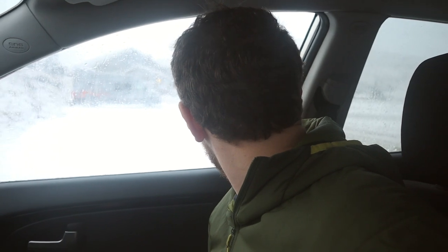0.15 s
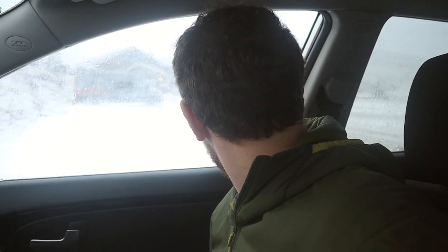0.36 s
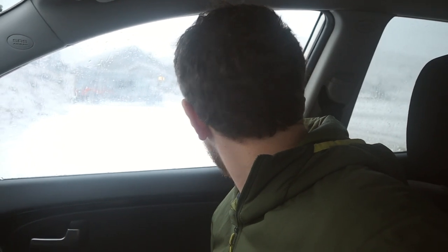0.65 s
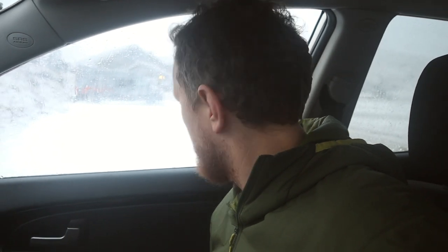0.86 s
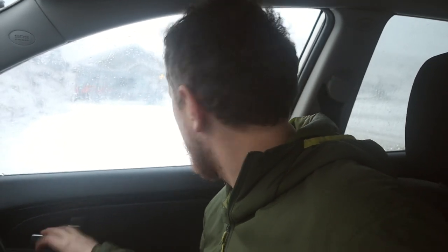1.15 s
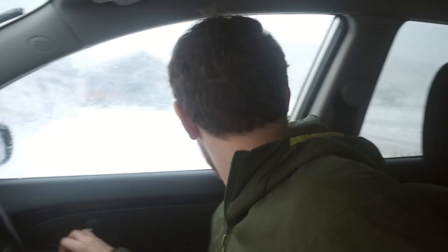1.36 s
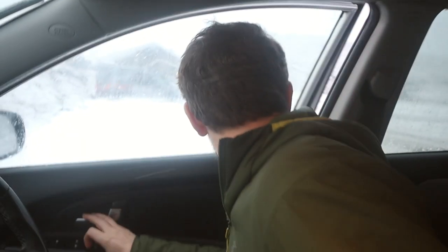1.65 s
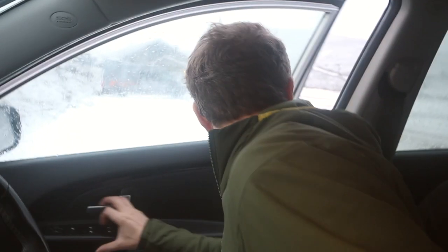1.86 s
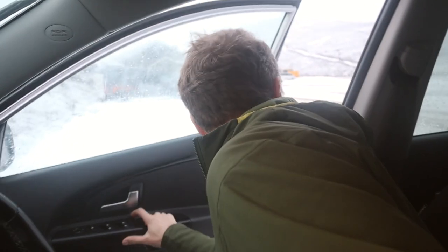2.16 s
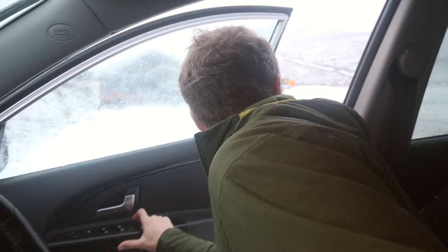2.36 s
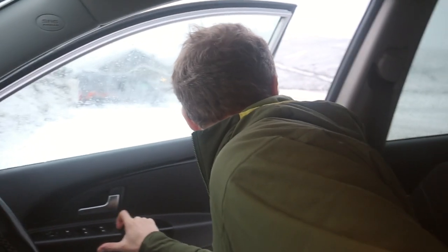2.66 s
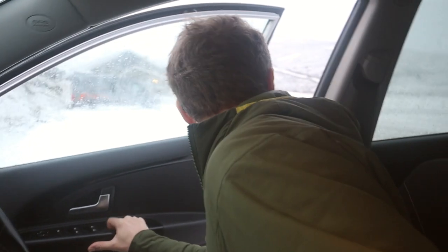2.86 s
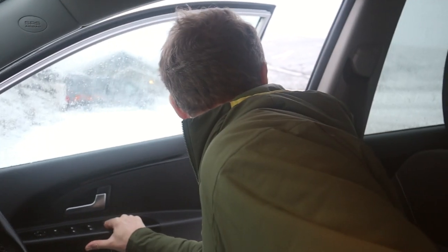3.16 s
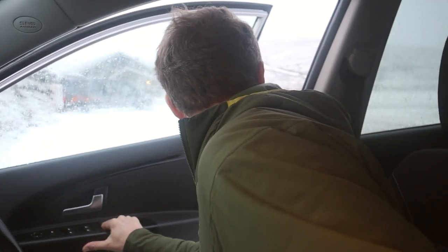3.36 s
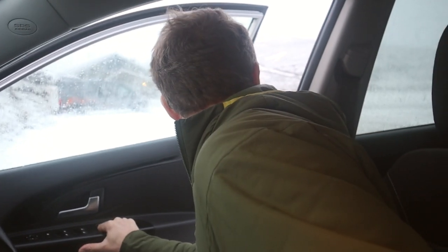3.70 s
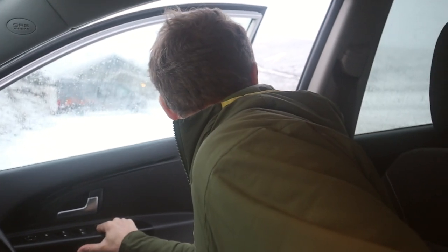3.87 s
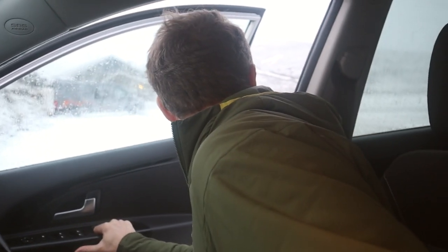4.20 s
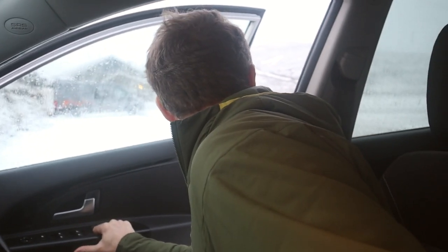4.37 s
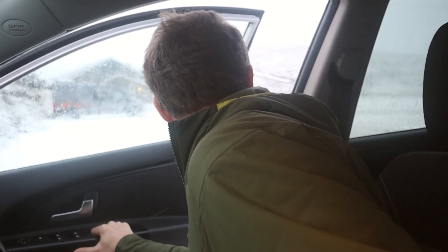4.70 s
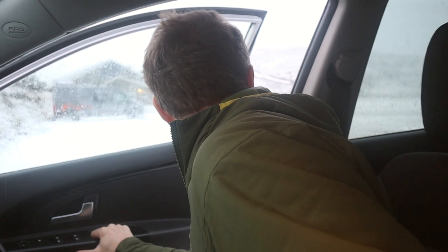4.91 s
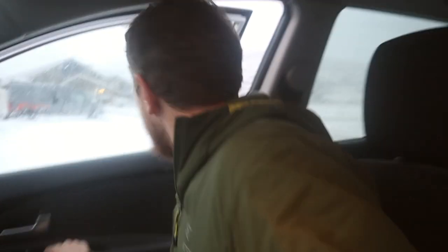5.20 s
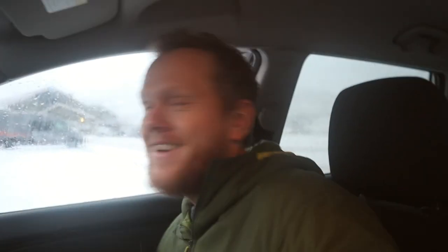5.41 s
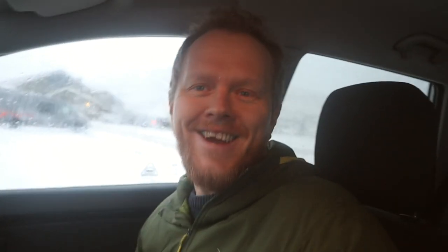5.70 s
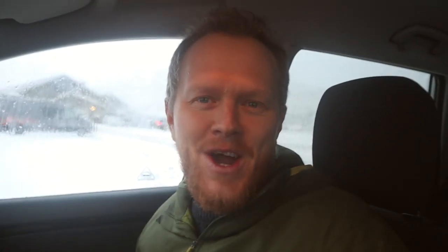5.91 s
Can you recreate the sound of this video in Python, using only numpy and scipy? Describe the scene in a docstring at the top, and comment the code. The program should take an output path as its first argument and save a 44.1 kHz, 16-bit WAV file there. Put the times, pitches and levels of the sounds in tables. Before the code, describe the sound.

Inside a parked car, a nylon jacket rustles, then a door handle knocks and the latch lets go with a clunk. Soft outdoor air comes in through the gap, and a small electric motor hums faintly under scattered plastic clicks. At the end the door is pulled shut with a loud, deep thump and a brief rattle. The microphone is close, inside the cabin.

```python
"""Hollow knocks and clicks sound inside a parked car as a hand bumps the door trim and the latch lets go.
With the door ajar, a small electric motor hums over the outdoor noise; switches click, a jacket rustles.
Then the door is pulled shut: its rubber seal chirps, the cabin booms and loose fittings rattle."""
import sys
import numpy as np
from scipy import signal
from scipy.io import wavfile

SR = 44100
rng = np.random.default_rng(int(sys.argv[2]) if len(sys.argv) > 2 else 0)


def put_to_file(sound):
    """Save the sound as 16-bit audio at rate SR, in the file named by the first command-line argument."""
    columns = np.atleast_2d(sound).T  # one column per channel
    safe = np.clip(columns, -1, 1)
    whole_steps = np.round(safe * 32767)
    wavfile.write(sys.argv[1], SR, whole_steps.astype(np.int16))


N = 266760
T = np.arange(N) / SR
BAND_EDGES_HZ = 22 * 2 ** np.arange(0, 10, .5)  # half an octave apart
UNLATCH_AT_S, SWING_FOR_S = 1.22, 1
SHUT_AT_S, PULL_FOR_S = 5.576, 0.19

# A "t60" is the time a sound takes to fade by 60 dB.
# knocks on the handle and the hollow behind it: (time [s], level [dB], pitch [Hz], t60 [s])
HAND_KNOCKS = [(1.153, -21, 368, 0.1), (1.252, -18, 245.6, 0.13), (1.373, -12.5, 396, 0.064),
               (1.386, -10.5, 419, 0.05), (1.659, -14, 321, 0.086), (1.669, -7, 254.4, 0.12),
               (1.846, -32, 231, 0.24), (2.018, -21.5, 200.4, 0.13), (2.077, -22, 219, 0.11),
               (2.570, -29.5, 326, 0.072), (2.726, -25.5, 390, 0.025)]


def door_blows(sealed_ring=1.17, loose_ring=0.57, contact_cycles=0.27):
    """Each blow makes the door boom and its panels clatter; soft ones start slowly and sound dull."""
    # blows on the door: (time [s], level [dB], boom against clatter [dB], dull above [Hz])
    blows = [(1.418, -7.5, -7.5, 596), (1.426, -11.5, 1.5, 970), (1.451, -13.5, 8, 454),
             (4.183, -34, -21, 1300), (4.991, -28.5, -15, 1010), (5.556, -11, -17, 1300),
             (5.576, -16, 9, 800), (5.608, -21, -4, 1450), (5.680, -20.5, -28, 900),
             (5.969, -33.5, -5, 920), (6.025, -23, -5.5, 930)]
    # deep tones of the door and cabin air: (pitch [Hz], level [dB], base t60 [s])
    boom_tones = [(49.3, -13, 0.41), (80.4, -10, 0.37), (91.8, -11, 0.55), (137.6, 0.5, 0.14),
                  (179, -5.5, 0.14), (203.5, -14.5, 0.17), (296.5, -24, 0.36), (367, -16, 0.086),
                  (455, -6.5, 0.13), (539, -1.5, 0.085), (624, -31, .06), (769, -5, 0.077),
                  (1000, -20, 0.034)]
    # the panels' crowded tones, played as bands of noise: (frequency [Hz], level [dB], t60 [s])
    panel_bands = [(150, -13, 0.33), (385, -4, 0.11), (880, -10, 0.06), (2000, -12, 0.15),
                   (5000, -8.5, 0.15), (14000, -18, .07)]
    out, t = np.zeros(N), T[:SR // 2]
    for s, db, boom_db, soft_hz in blows + door_bounces():
        stretch = sealed_ring if s > SHUT_AT_S - PULL_FOR_S else loose_ring  # a sealed cabin booms longer
        boom = clatter = 0
        for hz, tone_db, t60 in boom_tones:
            gain = from_db(tone_db) / np.hypot(1, (hz / soft_hz) ** 2)
            boom += gain * sine(hz, t) * fade(t, t60 * stretch)
        for low, high in zip(BAND_EDGES_HZ[5:], BAND_EDGES_HZ[6:]):
            band_db, t60 = at_hz(panel_bands, low)
            gain = from_db(band_db) / np.hypot(1, (low / soft_hz) ** 1.83)
            clatter += gain * unit_band(rng.standard_normal(len(t)), low, high) * fade(t, t60)
        push = 1 - np.exp(-(t * soft_hz / contact_cycles) ** 2)
        add(out, s, from_db(db) * push * (from_db(boom_db) * boom + clatter))
    return out


def door_bounces(count=3, every_s=.062, first_db=-24.5, loss_db=2, boom_db=9.5, soft_hz=240):
    """List the soft blows of the shut door bouncing on its seal, each a little weaker."""
    return [(SHUT_AT_S + (k + 1) * every_s, first_db - k * loss_db, boom_db, soft_hz)
            for k in range(count)]


def knocks(sag=0.11, sag_s=0.0196, rise_s=0.00098, steel_from_db=-7.5, steel_growth=1.8):
    """The hollow behind the handle rings; the harder the knock, the more the latch steel joins in."""
    # tones of the hollow: (multiple of the knock's pitch, level [dB])
    hollow_tones = [(.81, -4.5), (1.001, 4), (1.13, -2), (1.45, -5.5), (1.85, -8.5)]
    # tones of the latch steel: (pitch [Hz], level [dB], t60 [s])
    steel_tones = [(780, -4, 0.021), (1695, -11.5, 0.035), (1752, -4, 0.032), (2010, -16, 0.052),
                   (3740, -8.5, 0.016)]
    out, t = np.zeros(N), T[:SR // 3]
    bent_time = t + sag * sag_s * (1 - np.exp(-t / sag_s))  # the pitch sinks as the hand covers the hollow
    steel = sum(from_db(db) * sine(hz, t) * fade(t, t60) for hz, db, t60 in steel_tones)
    for s, db, hz, t60 in HAND_KNOCKS:
        tones = sum(from_db(tone_db) * sine(hz * k, bent_time) for k, tone_db in hollow_tones)
        hollow = tones * (1 - np.exp(-t / rise_s)) * fade(t, t60)
        steel_gain = from_db(steel_growth * (db - steel_from_db))
        add(out, s, from_db(db) * (hollow + steel_gain * steel))
    return out


def knock_clicks(ring_hz=1807, edge_db=-12.5, body_db=-7.5, dulling=0.81, dull_from_db=-17):
    """List the click that starts each knock; a heavy knock loses some of its bright edge."""
    return [(s, db - 3.5, ring_hz, edge_db - dulling * max(db - dull_from_db, 0), body_db)
            for s, db, *_ in HAND_KNOCKS]


def clicks(rise_s=0.0012, trim_hz=3240, blend=0.2):
    """Hard plastic parts meet: a crack of noise, plus a short ring from the part and from the trim."""
    # latch, switch and trim clicks: (time [s], level [dB], ring [Hz], bright edge [dB], dull body [dB])
    contacts = [(1.319, -18.5, 1690, -8.5, -9), (1.3472, -21, 1100, -10, 3), (1.4031, -8, 3370, -17, -10.5),
                (1.4224, -24, 1040, -16, 6), (1.4656, -14.5, 1150, -20.5, -6),
                (1.5826, -12, 3390, -18, -33), (1.9243, -31, 8500, -11, -19), (1.981, -25, 1870, -26, -3),
                (2.0715, -22, 1080, -11, -19), (2.1842, -19, 1890, -18, -4.5),
                (2.2082, -23.5, 1360, -18, -5), (2.2272, -19.5, 3970, -13, -12),
                (2.2399, -18, 1730, -15, -10), (2.2662, -14, 1030, -21.5, -6),
                (2.3198, -16.5, 8230, -10.5, -15), (2.3527, -25, 1350, -19, -11),
                (2.3869, -15, 3110, -19.5, -25), (2.5483, -13.5, 1300, -23.5, -14),
                (2.6089, -17, 1340, -18.5, -16), (2.8331, -11.5, 1830, -33, -15),
                (3.8861, -25.5, 1490, -16.5, -9), (3.9713, -25.5, 1770, -17.5, -6),
                (4.1819, -13, 1130, -16.5, -6), (4.2659, -23, 4120, -13.5, -25),
                (4.9581, -23.5, 3700, -14, -4), (4.993, -18, 1600, -21, -18),
                (5.324, -13.5, 3200, -17.5, -11.5), (5.3773, -20.5, 3200, -17, -16),
                (5.5717, -7, 1010, -31, -5), (5.6083, -19, 1530, -26, -5), (5.6795, -20, 2160, -20.5, -5),
                (5.722, -19, 1940, -12, -4), (5.7921, -24.5, 1460, -8, -36), (5.9974, -21.5, 1020, -21, -6)]
    out, t = np.zeros(N), T[:SR // 8]
    rise = 1 - np.exp(-(t / rise_s) ** 2)
    crack = rise * (fade(t, t60=0.011) + from_db(-14) * fade(t, t60=0.049))
    for s, db, ring_hz, edge_db, body_db in contacts + knock_clicks():
        white = rng.standard_normal((6, len(t)))
        body = unit_band(white[0] * rise * fade(t, t60=0.079), 190, 1160)
        clack = unit_band(white[1] * crack, 1140, 2120)
        snap = unit_band(white[2] * crack, 2460, 5060)
        edge = unit_band(white[3] * crack, 5000, 8340)
        edge += from_db(-5.5) * unit_band(white[4] * crack, 9600, 13600)
        rough_ring = unit_band(white[5] * crack, ring_hz / 1.2, ring_hz * 1.2)
        part, trim = [unit_power(sine(hz, t) * rise * fade(t, t60=0.02)) for hz in (ring_hz, trim_hz)]
        dull = from_db(body_db) * body + from_db(-12 + blend * body_db) * clack
        bright = from_db(-7.5 + blend * edge_db) * snap + from_db(edge_db) * edge
        rings = from_db(-13) * rough_ring + from_db(-14) * part + from_db(-19.5) * trim
        add(out, s, from_db(db - 20) * (dull + bright + rings))
    return out


def end_stops():
    """The arm that holds the door and a switch each snap home with one hard, very short ping."""
    # pings: (time [s], level [dB], pitch [Hz], t60 [s])
    pings = [(1.6704, -7.5, 1720, 0.014), (4.1829, -5, 1150, 0.0056)]
    out, t = np.zeros(N), T[:SR // 20]
    for s, db, hz, t60 in pings:
        add(out, s, from_db(db) * sine(hz, t) * fade(t, t60))
    return out


def seal_chirp(at_s=5.5545, start_hz=540, end_hz=800, glide_s=0.0052, rise_s=0.00017, t60=0.071):
    """Air trapped by the rubber seal rings and rises in pitch as the gap closes."""
    out, t = np.zeros(N), T[:SR // 6]
    hz = end_hz + (start_hz - end_hz) * np.exp(-t / glide_s)
    phase = 2 * np.pi * np.cumsum(hz) / SR
    tone = np.sin(phase) + from_db(-8) * np.sin(1.5 * phase)
    add(out, at_s, tone * (1 - np.exp(-t / rise_s)) * fade(t, t60))
    return out


def latch_ring_and_seal_squeaks(waver=0.0195):
    """Short wavering tones: the latch rings as it lets go, then rubber squeaks as the door shuts."""
    # the latch ring first, then the seal squeaks: (time [s], length [s], pitch [Hz], level [dB])
    short_tones = [(1.361, 0.044, 1074, -23.5), (5.465, 0.06, 2280, -49), (5.506, .026, 2560, -49),
                   (5.566, 0.036, 1010, -19), (5.668, .018, 2245, -34.5), (5.693, 0.022, 1490, -33)]
    out = np.zeros(N)
    wobbly_time = np.cumsum(1 + waver * drift(121)) / SR
    for s, length_s, hz, db in short_tones:
        shape, start = swell(length_s), round(s * SR)
        add(out, s, from_db(db) * shape * sine(hz, wobbly_time[start:start + len(shape)]))
    return out


def cabin_echoes(sound):
    """Nearby glass and the roof send back a few quick echoes."""
    # echoes: (delay [s], level [dB])
    echoes = [(.0031, -25), (.0057, -17), (.0094, -21.5), (0.0144, -26)]
    return sound + sum(from_db(db) * np.interp(T - delay_s, T, sound, left=0) for delay_s, db in echoes)


def motor(level_db=-40, fade_db_per_s=0.88, flutter_db=2.5):
    """A small motor hums and faintly whines, slowly fading; it comes in through the door gap."""
    # tones of the motor: (pitch [Hz], level [dB], pitch wander [Hz])
    motor_tones = [(156.1, -1, .8), (230, -18, 4), (478.5, -16, 3), (635.2, -21, 1.2), (717, -14.5, .7),
                   (958, -29, 3), (1434, -31, 3)]
    hum = 0
    for hz, db, wander_hz in motor_tones:
        gain = from_db(db + flutter_db * drift(6.7))
        phase = 2 * np.pi * np.cumsum(hz + wander_hz * drift(9.0)) / SR
        hum += gain * np.sin(phase)
    faded_db = fade_db_per_s * np.maximum(T - UNLATCH_AT_S, 0)
    return np.sqrt(2) * from_db(level_db - faded_db) * door_gap() * hum


def door_gap(leak_db=-28):
    """The share of outside sound that the door lets in; a little leaks through even when it is shut."""
    opening = np.clip((T - UNLATCH_AT_S) / SWING_FOR_S, 0, 1)
    closing = np.clip((SHUT_AT_S - T) / PULL_FOR_S, 0, 1)
    return np.maximum(opening * closing, from_db(leak_db))


def jacket(catches_per_s=30, catch_db=2, catch_t60=.012):
    """Nylon hisses as it slides, and its weave catches now and then in tiny scratches."""
    # tone colour of sliding cloth: (frequency [Hz], level [dB])
    slide_colour = [(530, 1), (900, -14), (1530, 2), (2140, -0.5), (4050, -2.5), (4680, -3.5), (6800, -8),
                    (7770, 3), (10000, -14), (12700, -9), (16000, -29)]
    # quick swishes of sleeve and collar: (time [s], length [s], level [dB])
    swishes = [(0.692, 0.26, -48), (0.837, 0.11, -49), (1.142, 0.054, -43.5), (1.982, 0.043, -45.5),
               (2.099, 0.066, -51), (2.188, 0.051, -44.5), (2.71, 0.24, -51)]
    # tone colour of a swish: (frequency [Hz], level [dB])
    swish_colour = [(410, -38), (700, -8), (757, 2), (946, -6), (1460, -3), (1660, -6), (2430, -2.5),
                    (4670, -4.5), (13700, -15.5), (16000, -17)]
    catches = (rng.random(N) < catches_per_s / SR) * np.minimum(rng.exponential(1, N), 3)
    scratch = from_db(catch_db) * signal.fftconvolve(catches, fade(T[:SR // 30], catch_t60))[:N]
    sliding = body_movement() * (1 + scratch) * noise(slide_colour, flutter_db=2.0, flutter_hz=26)
    strokes = np.zeros(N)
    for s, length_s, db in swishes:
        add(strokes, s, from_db(db) * swell(length_s))
    return sliding + strokes * noise(swish_colour, flutter_db=0.9, flutter_hz=40)


def small_ticks(per_s=18, above_cloth_db=10, spread_db=4, t60=0.0089):
    """Fingers, zip and cuffs tick at random, louder as the body moves."""
    moments = rng.random(N) < per_s / SR
    sizes = from_db(spread_db * np.clip(rng.standard_normal(N), -2, 2))
    bursts = signal.fftconvolve(moments * sizes, fade(T[:SR // 20], t60))[:N]
    hiss = unit_band(rng.standard_normal(N), 3970, 10900)
    return from_db(above_cloth_db) * body_movement() * bursts * hiss


def body_movement(settle_t60=6.3):
    """How strongly the person rustles over time: each move builds, holds and settles."""
    # leaning out, reaching for the switch, sitting back: (time [s], rise [s], hold [s], level [dB])
    moves = [(0.745, 0.6, 0.68, -49), (3.157, 0.28, 0.12, -62), (4.956, 0.2, .9, -52.5)]
    strength = 0
    for s, rise_s, hold_s, db in moves:
        build = np.clip((T - s) / rise_s, 0, 1)
        settle = fade(np.maximum(T - s - rise_s - hold_s, 0), settle_t60)
        strength += from_db(db) * build * settle
    return strength


def air_and_seat(rumble_boost_db=3, rush_boost_db=4.5, seat_db=4, gust_rise_t60=0.51, gust_fall_t60=0.99):
    """A deep rumble and a soft rush come from outdoors and from door gusts; the seat adds to the rush."""
    # outdoor noise over time: (time [s], rumble [dB], rush [dB])
    outdoor_levels = [(2.0, -47, -41.5), (2.46, -40.5, -38), (3.07, -45.5, -45), (3.43, -48, -46.5),
                      (3.88, -52, -51.5), (4.21, -52, -52.5), (5.3, -51, -47.5)]
    # gusts that the moving door pushes through the gap: (time [s], rumble [dB], rush [dB])
    gusts = [(1.45, -28.5, -24.5), (5.579, -19, -30.5)]
    # tone colour of the rumble: (frequency [Hz], level [dB])
    rumble_colour = [(12, -41), (20, -2), (48, -5.5), (108, -5.5), (124, -5), (140, -14), (180, -13),
                     (310, -120)]
    # tone colour of the rush: (frequency [Hz], level [dB])
    rush_colour = [(59, -12), (100, -13), (161, -0.5), (336, -16), (474, -12), (657, -18.5), (713, -15),
                   (813, -22), (1440, -27.5), (2130, -38), (5000, -43.5), (6500, -66), (11000, -120)]
    far_rumble, far_rush = from_db(over_time(outdoor_levels)) * door_gap()
    seat = from_db(seat_db) * body_movement()
    rumble = from_db(rumble_boost_db) * far_rumble
    rush = np.hypot(from_db(rush_boost_db) * far_rush, seat)  # hypot adds the powers of two noises
    for s, rumble_db, rush_db in gusts:
        gust = fade(np.abs(T - s), np.where(T < s, gust_rise_t60, gust_fall_t60))
        rumble = np.hypot(rumble, from_db(rumble_db) * gust)
        rush = np.hypot(rush, from_db(rush_db) * gust)
    return (rumble * noise(rumble_colour, flutter_db=1.5, flutter_hz=5.7)
            + rush * noise(rush_colour, flutter_db=2.04, flutter_hz=16))


def cabin_hush(level_db=-55):
    """A faint, nearly steady noise fills the cabin."""
    # tone colour of the hush: (frequency [Hz], level [dB])
    hush_colour = [(18, -29), (30, 4.5), (141, -0.5), (184, -6), (486, -5.5), (866, -13.5), (4080, -18),
                   (6210, -22), (8080, -25), (14400, -21), (16000, -23)]
    return from_db(level_db) * noise(hush_colour, flutter_db=-0.4, flutter_hz=8.0)


def noise(colour, flutter_db, flutter_hz):
    """Noise of power 1 with a given tone colour; its bands flutter partly together, partly alone."""
    out, together = np.zeros(N), drift(flutter_hz)
    for low, high in zip(BAND_EDGES_HZ, BAND_EDGES_HZ[1:]):
        hz = np.sqrt(low * high)
        if colour[0][0] <= hz <= colour[-1][0]:
            gain = from_db(at_hz(colour, hz)[0] + flutter_db * (together + drift(flutter_hz)))
            out += gain * band(rng.standard_normal(N), low, high)
    return unit_power(out)


def drift(rate_hz):
    """A smooth random wander, about 1 in size, worked out once every 40 samples."""
    memory = np.exp(-80 * np.pi * rate_hz / SR)
    white = rng.standard_normal(N // 40 + 2002)
    slow = signal.lfilter([1], [1, -2 * memory, memory * memory], white)[2000:]
    return np.interp(np.arange(N) / 40, np.arange(len(slow)), unit_power(slow))


def band(x, low_hz, high_hz):
    """Keep the part of a sound between two frequencies."""
    sections = signal.butter(2, [low_hz, min(high_hz, .45 * SR)], "band", fs=SR, output="sos")
    return signal.sosfilt(sections, x)


def unit_band(x, low_hz, high_hz):
    """One band of a sound, scaled to power 1."""
    return unit_power(band(x, low_hz, high_hz))


def unit_power(x):
    """Scale a sound to an average power of 1."""
    return x / np.sqrt(np.mean(x ** 2) + 1e-20)


def sine(hz, t):
    """A pure tone."""
    return np.sin(2 * np.pi * hz * t)


def fade(t, t60):
    """Die away by 60 dB every t60 seconds."""
    return np.exp(-np.log(1000) * t / t60)


def swell(length_s):
    """A smooth rise and fall."""
    return signal.windows.hann(round(length_s * SR))


def from_db(db):
    """Turn decibels into a multiplier."""
    return 10 ** (np.asarray(db) / 20)


def over_time(rows):
    """Read a table's columns at every sample."""
    times, *columns = np.transpose(rows)
    return [np.interp(T, times, column) for column in columns]


def at_hz(rows, hz):
    """Read a table's columns at one frequency."""
    frequencies, *columns = np.transpose(rows)
    return [np.interp(np.log(hz), np.log(frequencies), column) for column in columns]


def add(out, at_s, sound):
    """Mix a sound in at the given time."""
    start = round(at_s * SR)
    out[start:start + len(sound)] += sound[:N - start]


def scene():
    """Door, motor, air and clothing over the hush of the cabin, in one channel."""
    hush = cabin_hush()
    door = knocks() + door_blows() + cabin_echoes(clicks() + end_stops())
    door += seal_chirp() + latch_ring_and_seal_squeaks()
    return (door + motor() + air_and_seat() + jacket() + small_ticks() + hush)[None]


def record(dry, low_cut_hz=36, high_cut_hz=16000, port_hz=7900, port_q=6, port_db=-3):
    """The microphone loses deep bass, rings at its opening (port) and overloads; the top treble is cut."""
    thin = signal.sosfilt(signal.butter(1, low_cut_hz, "high", fs=SR, output="sos"), dry)
    heard = thin + from_db(port_db) * signal.lfilter(*signal.iirpeak(port_hz, port_q, fs=SR), thin)
    clipped = heard / (1 + heard ** 8) ** (1 / 8)  # rounds off only the loudest peaks
    return signal.sosfilt(signal.ellip(10, .1, 80, high_cut_hz, fs=SR, output="sos"), clipped)


dry = scene()
out = record(dry)
put_to_file(out)
```